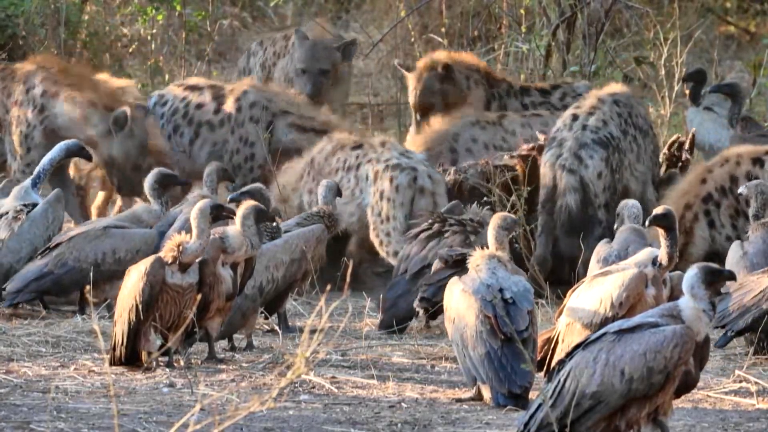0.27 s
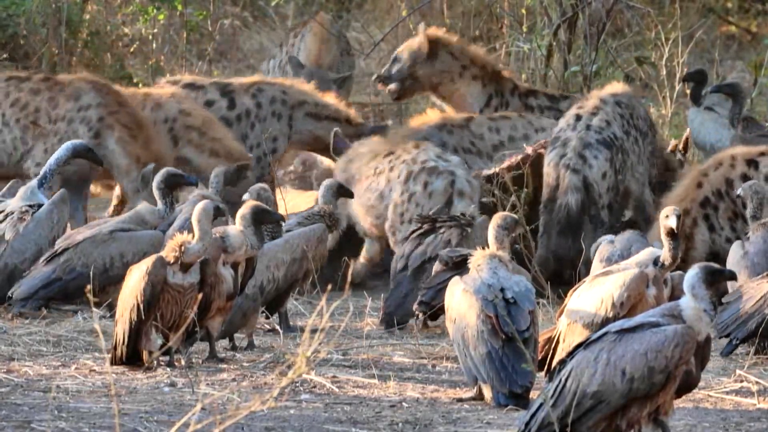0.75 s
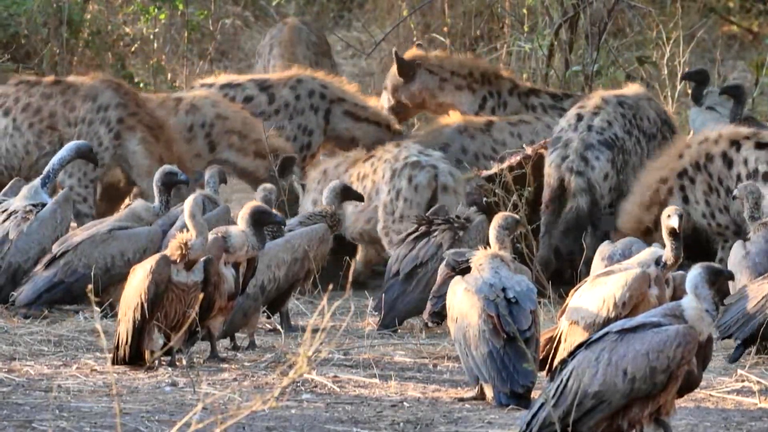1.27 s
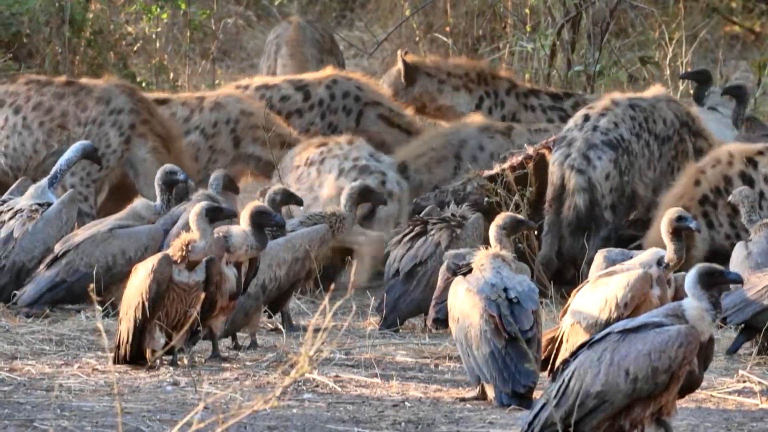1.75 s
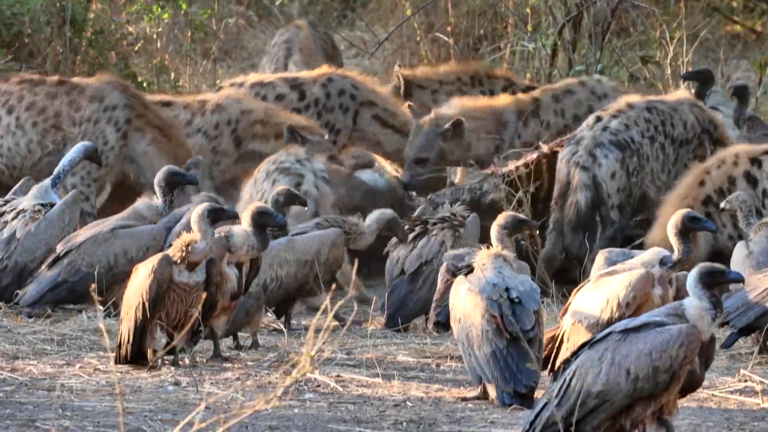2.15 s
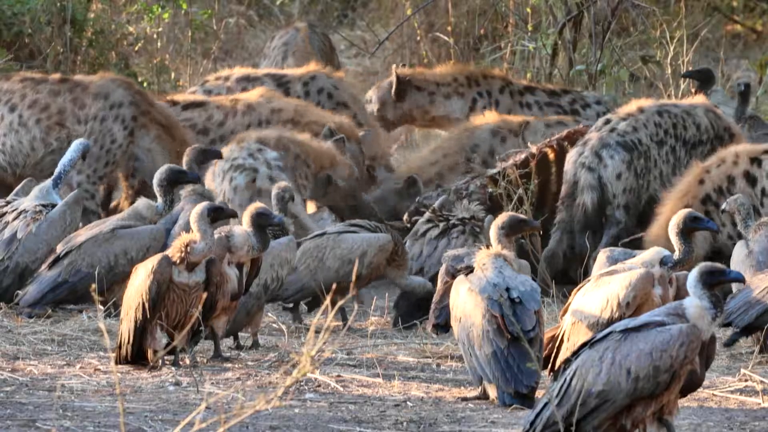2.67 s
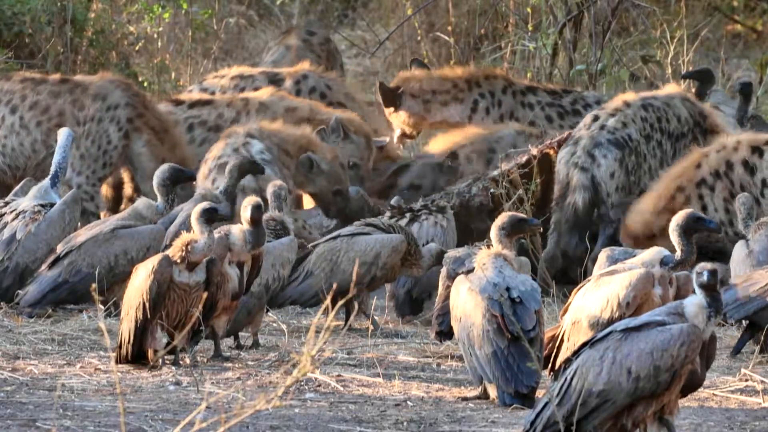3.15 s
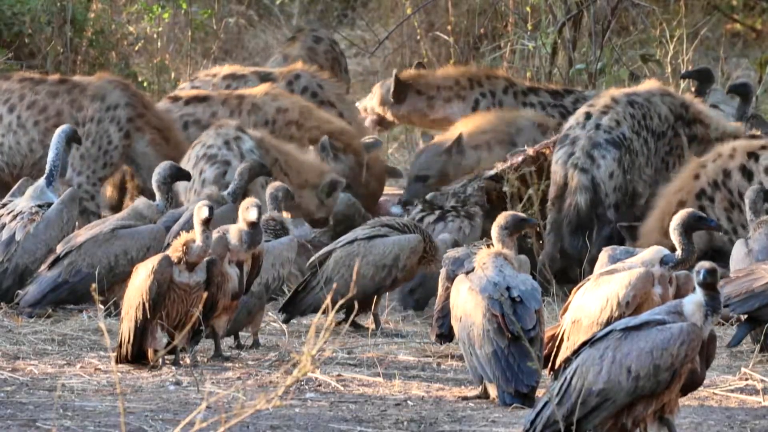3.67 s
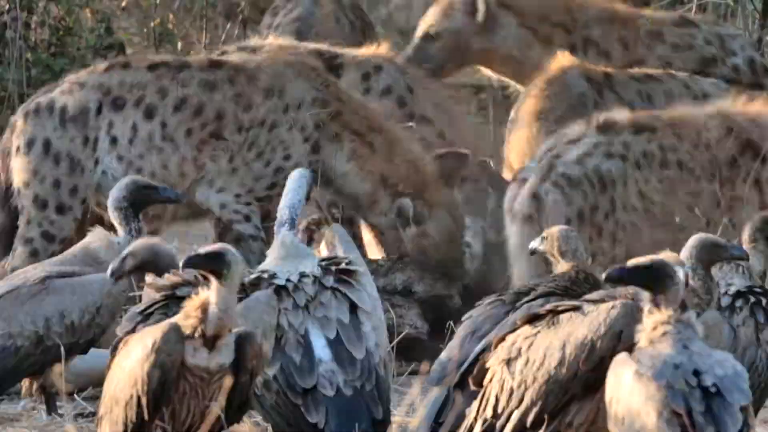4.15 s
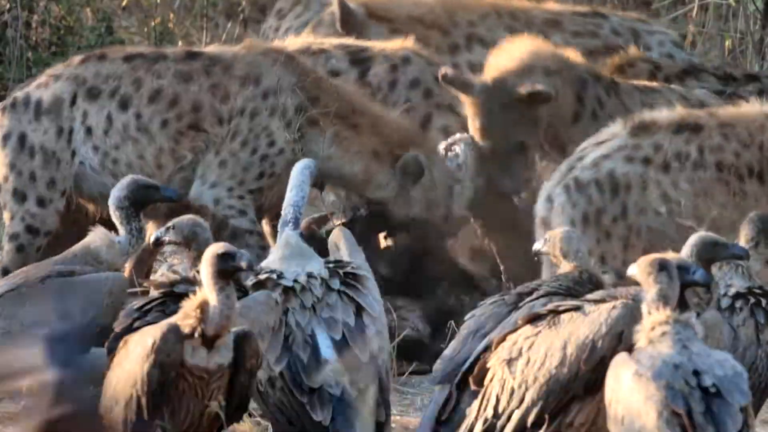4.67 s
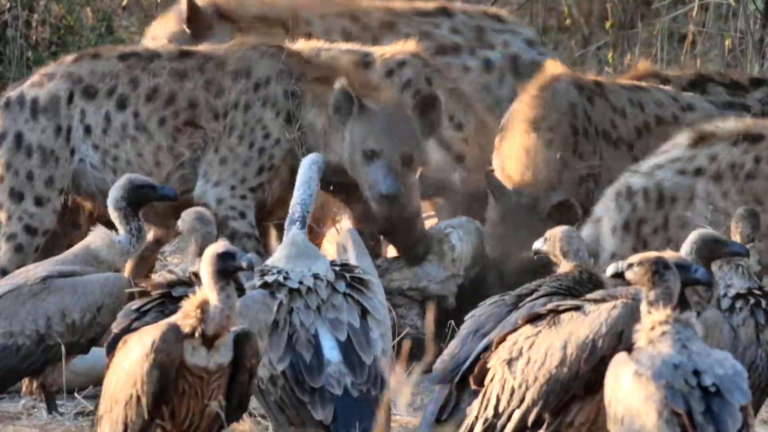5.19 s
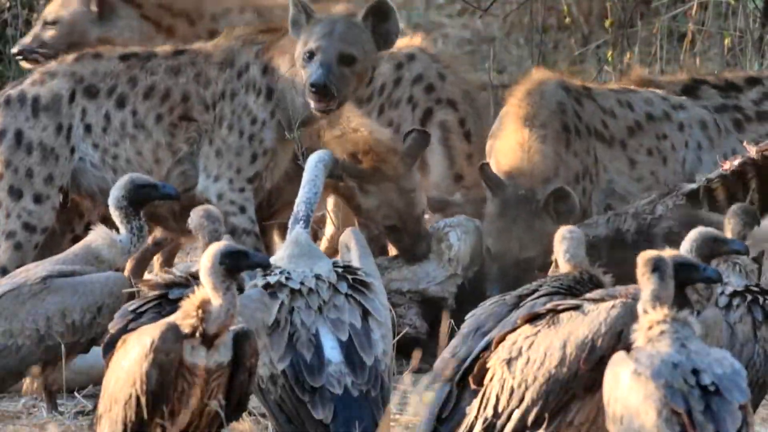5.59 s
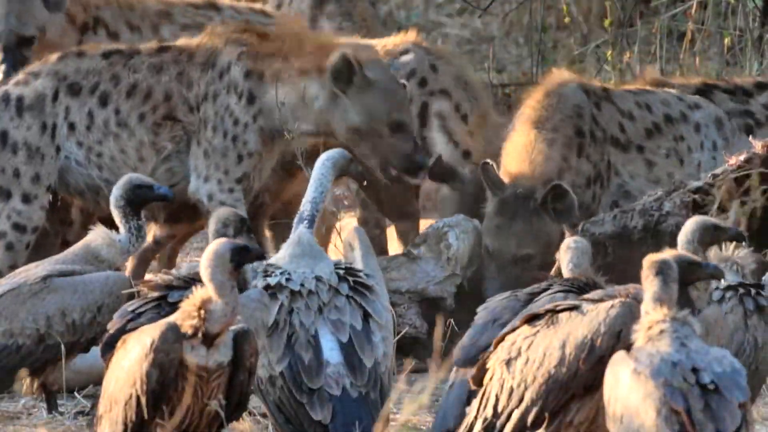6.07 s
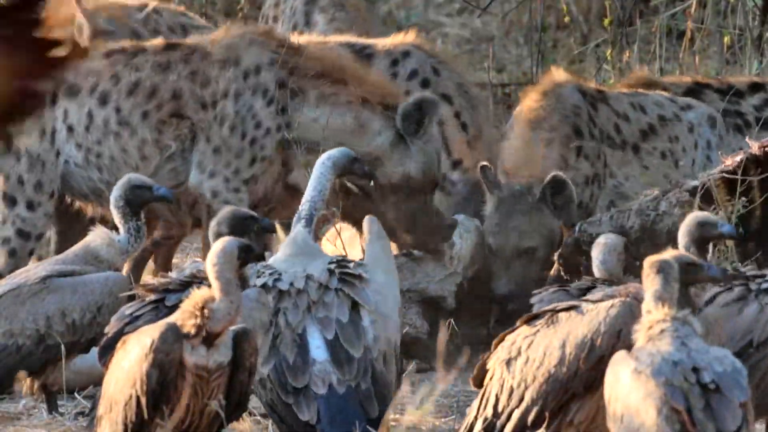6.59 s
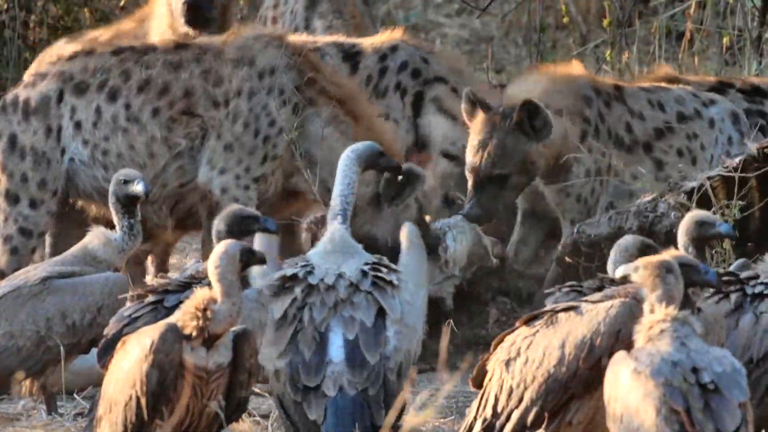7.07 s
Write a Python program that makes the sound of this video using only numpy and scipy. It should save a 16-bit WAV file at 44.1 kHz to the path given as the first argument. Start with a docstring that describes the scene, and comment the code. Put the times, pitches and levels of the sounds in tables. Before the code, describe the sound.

Hyenas squabble over a carcass while vultures wait. Twigs crack, then one loud close groan climbs, breaks higher and sinks away. The sound cuts out for an instant; then the trampling is nearer and crisper, with thuds, bone snaps and short vulture hisses. Distant hyenas answer in overlapping moans and a quick whoop before a low near groan ends it, with light echoes from thickets.

```python
"""Spotted hyenas squabble over a carcass in dry bush: vocal-fold harmonics, shaped by throat and mouth, slide in pitch.
Loud groans come from near the microphone, overlapping answers and moans from farther off. At the top of the
first groan the voice turns rough, then flips up an octave as its odd harmonics fade. Clumped crackle makes the
dry grass, noise bursts the snaps and thuds, resonant noise the rasping vultures, and gliding or wavering tones
the birds and insects. Faint air lies beneath, thickets return echoes, and the sound drops out briefly midway."""
import sys
import numpy as np
from scipy import signal
from scipy.fft import rfft, irfft, next_fast_len
from scipy.io import wavfile
from scipy.ndimage import uniform_filter1d, map_coordinates

SR = 44100
rng = np.random.default_rng(int(sys.argv[2]) if len(sys.argv) > 2 else 0)


def master(y):
    """Save y as 16-bit WAV."""
    cut = np.clip(np.atleast_2d(y).T, -1, 1)
    pcm = np.round(cut * 32767)  # scale
    wavfile.write(sys.argv[1], SR, pcm.astype(np.int16))


N = 323253
T = np.arange(N) / SR   # time [s]

# the brief dropout midway: (start [s], end [s])
SILENCE = (4.203, 4.279)
# colour of the moving air: (frequency [Hz], relative level [dB])
AIR_COLOUR = [(15, -69.5), (25, -23), (87, -3), (190, -8), (249, -8), (309, -7), (591, -6), (695, -3.5),
              (1160, -11), (1400, -11), (2050, -16), (6380, -20.5), (9070, -17.5), (9840, -22),
              (16000, -29)]
# echoes off trunks and thickets: (delay [s], level against the tail [dB])
THICKET_ECHOES = [(0.021,-29.5), (.034,-12), (.058,-11.5), (.087,-16), (.124,-19)]
# insect whines: (start [s], end [s], pitch [Hz], waver scale [Hz])
INSECT_WHINES = [(0,4.22,9100,50), (0,4.22,7200,20), (4.25,7.33,8660,30)]
# level of each whine: (level [dB])
INSECT_LEVELS = [-61, -70, -66]
# birds, thin chirps nearby and low coos far off:
# (time [s], start pitch [Hz], end pitch [Hz], length [s], level [dB])
BIRD_CALLS = [(0.357,5830,6760,0.054,-44.5), (2.064,5800,6910,0.066,-43), (2.437,3520,3650,0.041,-57),
              (2.895,5690,6955,0.063,-42.5), (3.758,3400,3640,0.039,-59), (.005,920,860,0.15,-55),
              (0.263,843,935,0.071,-53), (.435,916,872,0.067,-52), (0.713,874,817,0.083,-53)]
# rasping hisses of the vultures: (time [s], length [s], level [dB])
VULTURE_RASPS = [(4.505,0.057,-48.5), (5.573,0.037,-46.5), (6.114,0.058,-46.5)]
# throat resonances of each rasp: (frequency [Hz], width before damping [Hz], level [dB])
VULTURE_THROATS = [
    [(1707, 39, 4), (2200, 87, 6.5), (3410, 43, -0.5), (4270, 130, -3), (7800, 150, -2)],
    [(2200, 44, 5), (2630, 87, 3), (3650, 36, -2), (4270, 43, -5), (5500, 52, -6)],
    [(2364, 186, -3), (3330, 28, -14), (4170, 28, -3), (4500, 72, 1), (8100, 280, -5.5)],
]
# twigs and bones snapping: (time [s], peak level before trim [dB], centre [Hz], time to fall 60 dB [s])
TWIG_SNAPS = [(.448,-41,2980,0.031), (.509,-29,3700,.012), (.521,-21,3700,0.022), (.527,-37,3630,0.27),
              (.783,-34.5,2740,0.02), (3.077,-37,4500,0.013), (3.209,-42,1172,0.015),
              (4.189,-43,1480,0.0088), (4.811,-29.5,3957,0.026), (4.837,-27,1270,0.01),
              (4.862,-14.5,6994,0.0028), (4.890,-32,7000,0.0026), (4.903,-25.5,6990,0.0055),
              (5.424,-38.5,3500,.02), (5.759,-45,2500,.008), (6.097,-33,4284,0.0073),
              (6.472,-36.5,5000,0.026), (6.723,-21.5,6400,0.0069), (6.756,-28.5,7400,.03),
              (7.093,-14,6500,0.004), (7.099,-17.5,2860,0.0077), (7.149,-25.5,3600,0.062),
              (7.186,-27,5940,0.0075), (7.214,-24.5,5950,0.0055), (7.27,-39,7800,0.034)]
# paws and wing beats thudding: (time [s], peak level before trim [dB], centre [Hz], time to fall 60 dB [s])
PAW_THUDS = [(.522,-35.5,110,0.026), (.665,-40.5,126,0.026), (.989,-38,193,0.057), (3.332,-32.5,260,0.095),
             (4.29,-39,109,0.96), (4.44,-45,91.5,0.16), (5.06,-38,112,0.21), (6.725,-38,168,0.16),
             (7.095,-25.5,343,0.13)]
# colour of crunching stalks: (frequency [Hz], relative level [dB])
STALK_COLOUR = [(50,-19), (300,8), (900,5), (1500,-3.5), (2200,-2.5), (2900,-3), (3600,-3), (4700,-2.5),
                (6500,-11.5), (9000,-35), (15000,-37.5)]
# colour of swishing blades: (frequency [Hz], relative level [dB])
BLADE_COLOUR = [(2500,-39), (5000,-6.5), (7000,-4.5), (8600,2.5), (10000,-9), (12000,-21), (16000,-29.5)]
# shoves through dry grass: (time [s], hold [s], crunch level before trim [dB], swish level before trim [dB])
GRASS_SHOVES = [(.08,0.016,-58,-66), (0.443,0.062,-56,-62), (.51,0.0083,-52,-54.5), (0.778,.004,-53,-61),
                (0.853,0.13,-60.5,-65.5), (1.041,.015,-52,-62.5), (2.027,0.072,-53.5,-67),
                (2.594,0.037,-52,-68), (2.724,0.071,-65,-52), (3.203,0.033,-53.5,-68),
                (4.192,0.0044,-52,-71), (4.366,0.051,-49.5,-78), (4.505,0.05,-48.5,-68),
                (4.808,0.024,-46,-51.5), (4.863,.05,-47.5,-53.5), (4.89,0.24,-52.5,-58.5),
                (5.24,0.12,-59,-56.5), (5.416,0.013,-55,-57), (5.576,0.019,-47,-66), (5.76,.06,-66,-72.5),
                (6.04,.12,-52,-64.5), (6.469,.02,-71,-75), (6.721,0.054,-47,-55), (6.8,.23,-51.5,-56),
                (7.085,0.017,-44,-48.5), (7.13,.08,-49.5,-51.5), (7.266,0.073,-48.5,-47.5)]
# lowest throat resonance, before sharpening: (frequency [Hz], relative level [dB])
CHEST_RESONANCE = [(110,-39.5), (190,-19.5), (250,-6.5), (310,-9), (380,11.5), (440,0), (510,-13),
                   (570,-10.5), (660,-49), (900,-63.5), (2500,-107.5)]
# upper mouth resonances, before sharpening: (frequency [Hz], relative level [dB])
MOUTH_RESONANCES = [(300,-70.5), (600,-6), (690,-0.5), (765,7.5), (840,-3), (930,-12), (1010,-19.5),
                    (1160,-10.5), (1270,-7.5), (1350,-15), (1480,-38.5), (1850,-24), (2800,-56),
                    (3420,-31.5), (3900,-54)]
# far calls: (time [s], pitch [Hz], chest level before trim [dB], overtones against the chest [dB])
FAR_ANSWER = [(4.86,112.1,-59,-15), (5.13,133.5,-51,-6), (5.23,161,-36,-15.5), (5.4,170.8,-36.5,-8),
              (5.63,175.5,-36,-5), (5.86,196.9,-38,-6.5), (6,186.9,-39.5,-11), (6.23,154.7,-38.5,-10),
              (6.3,134.5,-47.5,-3), (6.42,116,-46,-2)]
FAR_LONG_MOAN = [(4.26,152,-47.5,-9.5), (4.4,146,-53,-11.5), (4.55,143.2,-53.5,-21), (4.7,150,-49.5,-6),
                 (4.9,170,-50,-9), (5.1,181.8,-51,-4), (5.2,188.5,-48,-31), (5.35,194,-59,3)]
FAR_WHOOP = [(5.33,187,-58,-12), (5.43,224.4,-40.5,-12), (5.475,263.6,-42.5,-5), (5.51,315,-38,-10),
             (5.545,298,-44,-9), (5.58,255.7,-42,3), (5.65,203,-61,-12)]
FAR_ROUGH_MOAN = [(5.66,192.1,-62,0), (5.8,214.2,-51.5,2.5), (5.97,224.8,-45,-5.5), (6.1,203,-49.5,-4),
                  (6.3,161.3,-60,-9), (6.42,148.4,-56.5,-8), (6.54,148.8,-52,-18)]
# near calls: (time [s], pitch [Hz], chest level before trim [dB], overtones against the chest [dB])
NEAR_LOUD_GROAN = [(1.04,102,-52,-5), (1.13,112.6,-47.5,-8.5), (1.22,120.8,-29.5,-4.5),
                   (1.3,129.5,-26,-5.5), (1.42,139.4,-28.5,-9), (1.55,154.1,-26.5,-3), (1.6,172.9,-25,-7.5),
                   (1.85,183.6,-20,-9), (2.01,192,-19.5,-8.5), (2.1,207,-20,-10), (2.14,242,-26,0),
                   (2.22,263.3,-21.5,-8), (2.315,260.4,-18.5,-20.5), (2.35,235.8,-23.5,-19),
                   (2.4,215.8,-21,-11), (2.46,197.7,-18,-6.5), (2.51,181.9,-23,-9.5), (2.6,172.9,-26,-8),
                   (2.7,159.7,-27,-9), (2.8,142.6,-30.5,-9), (2.95,125.5,-40.5,6), (3.11,111.3,-57.5,-4)]
NEAR_LAST_GROAN = [(6.46,98.9,-53.5,-1), (6.6,110.8,-45,-7.5), (6.71,116,-46,-1), (6.77,117.9,-35,-1.5),
                   (6.9,125.7,-29,-5.5), (7.04,127.5,-28.5,0), (7.17,129,-28,-4), (7.27,130.4,-36,2),
                   (7.33,130.7,-30,-9)]

BUSH_T60_S = 0.89
# steady trampling, farther off before the silence and nearer after it: (crunch [dB], swish [dB]), before trim
TRAMPLE_FAR, TRAMPLE_NEAR = (-67, -80.5), (-62.5, -69)
SHOVE_RISE_S, SETTLE_DB_PER_S = 0.012, 258
# on high notes the odd harmonics swell, and a little higher the voice turns rough
STRAIN_WIDTH_HZ, ODD_LEAD_HZ = 7.4, 25
STRAIN_ODD_DB = 9.5   # strain doubles the period, which lifts the odd harmonics
WANDER_DB, WANDER_PER_S = 1.5, 4.01   # each harmonic waxes and wanes on its own
# in an octave flip the odd harmonics fall away and only a share of the roughness remains
FLIP_S, FLIP_ODD_DB, FLIP_ROUGH_SHARE = 0.023, -35, 0.7


def from_db(db):
    """Decibels to gain."""
    return 10 ** (np.asarray(db) / 20)


def rms_one(x):
    """Scale to unit rms."""
    return x / np.sqrt(np.mean(x ** 2) + 1e-20)


def step(x):
    """A smooth step from 0 to 1 around x = 0."""
    return .5 + .5 * np.tanh(x)


def in_time(rows, t):
    """The columns of a curve at times t."""
    s, *columns = np.transpose(rows)
    return [np.interp(t, s, c) for c in columns]


def gain_at(spectrum, hz):
    """Gain of a spectrum, straight on a log-frequency axis."""
    points, db = np.transpose(spectrum)
    return from_db(np.interp(np.log(hz + 1), np.log(points), db))


def coloured(x, spectrum):
    """Give x a spectrum; rms 1."""
    size = next_fast_len(len(x))
    gains = gain_at(spectrum, np.fft.rfftfreq(size, 1 / SR))
    return rms_one(irfft(rfft(x, size) * gains, size)[:len(x)])


def drift(rate, size):
    """Smooth chance with spread 1, from two random knots per cycle of the rate in Hz."""
    knots = rng.standard_normal(int(size / SR * rate * 2) + 4)
    places = np.arange(size) / SR * rate * 2
    return rms_one(map_coordinates(knots, [places], order=3, mode="nearest"))


def bush(x, wet_db):
    """Trunks and thickets return a few weak echoes and a thin, long tail."""
    t = T[:SR]
    tail = rng.standard_normal(SR) * from_db(-60 * t / BUSH_T60_S) * np.clip(t / 0.016, 0, 1)
    response = tail / np.linalg.norm(tail)
    for delay, db in THICKET_ECHOES:
        response[int(delay * SR)] += from_db(db)
    return x + signal.fftconvolve(x, from_db(wet_db) * response)[:N]


def moving_air(level_db=-54):
    """Faint air around the microphone: steady random pressure with a fixed colour."""
    return from_db(level_db) * coloured(rng.standard_normal(N), AIR_COLOUR)


def insects(blur_hz=45, throb=0.17):
    """Narrow wavering whines, blurred by uneven wing strokes."""
    out = np.zeros(N)
    for (start, end, hz, waver_hz), db in zip(INSECT_WHINES, INSECT_LEVELS):
        waver = waver_hz * (drift(8.7, N) + drift(300, N)) * 0.55
        pitch = hz + waver + blur_hz * drift(1500, N)
        whine = (1 + throb * drift(60, N)) * np.sin(2 * np.pi * np.cumsum(pitch) / SR)
        out += from_db(db) * (T >= start) * (T < end) * whine
    return out


def birds():
    """Short whistled glides that swell as they level off."""
    out = np.zeros(N)
    for s, start_hz, end_hz, length, db in BIRD_CALLS:
        u = np.linspace(0, 1, int(length * SR))
        hz = start_hz + (end_hz - start_hz) * np.sin(1.5 * u) + 50 * drift(200, len(u))
        swell = np.sin(np.pi * u ** 2.2)
        at = int(s * SR)
        out[at:at + len(u)] += from_db(db) * swell * np.sin(2 * np.pi * np.cumsum(hz) / SR)
    return out


def vultures(rate_hz=140, flutter=0.28, damping_hz=650):
    """Air forced through a fluttering throat, coloured by its damped resonances."""
    out = np.zeros(N)
    for (s, length, db), throat in zip(VULTURE_RASPS, VULTURE_THROATS):
        size = int(length * SR)
        flap_hz = rate_hz * (1 + 0.26 * drift(90, size))
        flap = 1 + flutter * np.sin(2 * np.pi * np.cumsum(flap_hz) / SR)
        jet = rng.standard_normal(size) * flap * signal.windows.tukey(size, .4)
        rasp = 0
        for k, (hz, width, level) in enumerate(throat):
            resonance = signal.iirpeak(hz, hz / (width + damping_hz), fs=SR)
            rasp = rasp + (-1) ** k * from_db(level) * signal.lfilter(*resonance, jet)
        at = int(s * SR)
        out[at:at + size] += from_db(db) * rms_one(rasp)
    return out


def blows(rows, octaves, level_db):
    """Each blow is a dying burst, broadly tuned by the size of what is hit."""
    out = np.zeros(N + SR)
    t = T[:SR // 2]
    for s, peak_db, hz, t60 in rows:
        band = [hz / 2 ** octaves, min(hz * 2 ** octaves, 11000)]
        tuned = signal.butter(1, band, "band", fs=SR, output="sos")
        dull = signal.butter(2, band[1], fs=SR, output="sos")
        burst = rng.standard_normal(len(t)) * from_db(-60 * t / t60)
        burst = signal.sosfilt(dull, signal.sosfilt(tuned, burst))
        at = int(s * SR)
        out[at:at + len(t)] += from_db(peak_db + level_db) * burst / np.abs(burst).max()
    return out[:N]


def crackle(per_s, spread_db, smooth):
    """Many tiny fractures of uneven size, coming in clumps over a smooth rub; rms 1."""
    born = rng.random(N) < per_s * from_db(4 * drift(25, N)) / SR
    sizes = from_db(spread_db * np.minimum(rng.exponential(1, N), 4)) * rng.choice([-1, 1], N)
    return rms_one(rms_one(born * sizes) + smooth * rng.standard_normal(N))


def grass(crunch_db=0, swish_db=6):
    """Stalks crunch and blades swish as the animals shove each other: each shove rises, holds and settles."""
    trample_db = np.where(T[:, None] < SILENCE[0], TRAMPLE_FAR, TRAMPLE_NEAR).T
    power = from_db(trample_db) ** 2
    for s, hold, *levels_db in GRASS_SHOVES:
        rise = np.clip(1 + (T - s) / SHOVE_RISE_S, 0, 1)
        settle = from_db(-SETTLE_DB_PER_S * np.clip(T - s - hold, 0, 1))
        power = power + np.outer(from_db(levels_db), rise * settle) ** 2
    stalk_gain, blade_gain = np.sqrt(power)
    stalks = coloured(crackle(per_s=1500, spread_db=6.5, smooth=0.89), STALK_COLOUR)
    blades = coloured(crackle(per_s=7100, spread_db=6.5, smooth=0.69), BLADE_COLOUR)
    return stalk_gain * from_db(crunch_db) * stalks + blade_gain * from_db(swish_db) * blades


def hyena(call, level_db, bass_db, odd_db, calm, strained, strain_hz, flips_at=np.inf,
          throat_scale=1.012, sharpness=1.05, tilt_db=-0.8, jaw_opens_hz=192, jitter=0.00416,
          flutter_db=2, rasp_hz=75, rasp_phase=0.75, hiss=0.99):
    """Vocal-fold harmonics pass throat and mouth; roughness goes from calm to strained above strain_hz.

    When the odd harmonics fade, at flips_at [s], the voice jumps an octave."""
    span = (T >= call[0][0]) & (T <= call[-1][0])
    t = T[span]
    size = len(t)
    pitch, chest_db, mouth_db = in_time(call, t)
    pitch = uniform_filter1d(pitch, SR // 40, mode="nearest")   # muscles round off every turn

    strain = step((pitch - strain_hz) / STRAIN_WIDTH_HZ)
    doubling = step((pitch + ODD_LEAD_HZ - strain_hz) / STRAIN_WIDTH_HZ)
    flipped = step((t - flips_at) / FLIP_S)
    rough = (calm + (strained - calm) * strain) * (1 + (FLIP_ROUGH_SHARE - 1) * flipped)
    odd_db = (odd_db + STRAIN_ODD_DB * doubling) * (1 - flipped) + FLIP_ODD_DB * flipped

    # uneven cycles: the timing and the strength of the pulses shake
    uneven_pitch = pitch * (1 + jitter * drift(22.14, size))
    phase = 2 * np.pi * np.cumsum(uneven_pitch) / SR + rasp_phase * rough * drift(rasp_hz, size)
    shake = 1 + rough * drift(rasp_hz, size)

    k = np.arange(1, 29)[:, None]   # harmonic numbers
    wander = np.array([drift(WANDER_PER_S, size) for _ in k])
    source = from_db(odd_db * (k % 2) + bass_db * (k == 1) + WANDER_DB * wander)
    # the jaw opens on high notes, so the lowest resonance rides up with the pitch
    jaw = np.maximum(1, pitch / jaw_opens_hz)
    chest = source * gain_at(CHEST_RESONANCE, k * pitch * throat_scale / jaw) ** sharpness
    mouth = source * gain_at(MOUTH_RESONANCES, k * pitch * throat_scale) ** sharpness
    # the slope per octave is 1.5 times tilt_db, and 0.5 times once flipped
    mouth = mouth * from_db(tilt_db * (1.5 - flipped) * np.log2(k))
    mouth_gain = from_db(mouth_db + flutter_db * drift(18, size))   # the overtones flutter
    chest = chest / np.linalg.norm(chest, axis=0)
    mouth = mouth / np.linalg.norm(mouth, axis=0)
    gains = chest + mouth_gain * mouth

    lag = np.pi * k ** 2 / 7   # the throat spreads each pulse out
    voiced = np.sqrt(2) * np.sum(gains * np.cos(k * phase - lag), axis=0) * shake
    # turbulence at the folds, gated by each cycle
    breath = coloured(rng.standard_normal(size), MOUTH_RESONANCES)
    turbulence = hiss * rough * (1 + np.cos(phase)) * mouth_gain * breath
    fade = np.clip(np.minimum(t - t[0], t[-1] - t) / .03, 0, 1)
    out = np.zeros(N)
    out[span] = from_db(chest_db + level_db) * fade * (voiced + turbulence)
    return out


def far_hyenas():
    """Voices farther off: an answer, a long moan, a whoop and a rough moan."""
    far = hyena(FAR_ANSWER, level_db=-1.2, bass_db=4, throat_scale=1.023, sharpness=0.85, odd_db=-6.0,
                calm=.1, strained=.15, strain_hz=193.7)
    far += hyena(FAR_LONG_MOAN, level_db=0.1, bass_db=24, odd_db=-15.5,
                 calm=.1, strained=.14, strain_hz=260)
    far += hyena(FAR_WHOOP, level_db=-4.0, bass_db=34, odd_db=-30,
                 calm=.06, strained=0.098, strain_hz=303, jaw_opens_hz=330)
    far += hyena(FAR_ROUGH_MOAN, level_db=4.0, bass_db=-9, odd_db=-12.5,
                 calm=0.2, strained=.27, strain_hz=196)
    return far


def near_hyenas():
    """Two groans near the microphone; the first flips up an octave at its top."""
    near = hyena(NEAR_LOUD_GROAN, level_db=-2.0, tilt_db=-1.5, bass_db=-6.5, odd_db=-2.5,
                 calm=0.015, strained=0.19, strain_hz=203, flips_at=2.2)
    near += hyena(NEAR_LAST_GROAN, level_db=-1.0, bass_db=13, throat_scale=1.0, sharpness=1.085,
                  jitter=0.0016, odd_db=-5, calm=0.0096, strained=.3, strain_hz=200)
    return near


def scene():
    """All sources in the open bush, over faint moving air."""
    background = moving_air() + insects() + bush(birds(), wet_db=-7)
    snaps = blows(TWIG_SNAPS, octaves=0.44, level_db=-3)
    thuds = blows(PAW_THUDS, octaves=0.99, level_db=-5)
    scuffle = bush(vultures() + snaps + thuds + grass(), wet_db=-10.5)
    voices = bush(far_hyenas(), wet_db=-7.0) + bush(near_hyenas(), wet_db=-7.5)
    return (background + scuffle + voices)[None]


def record(dry):
    """The sound drops out briefly midway, and the treble above 15.8 kHz is cut."""
    live = (T < SILENCE[0]) | (T > SILENCE[1])
    treble_cut = signal.ellip(10, .1, 90, 15800, fs=SR, output="sos")
    return signal.sosfilt(treble_cut, dry * live)


dry = scene()
out = record(dry)
master(out)
```